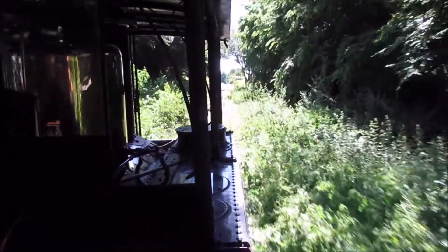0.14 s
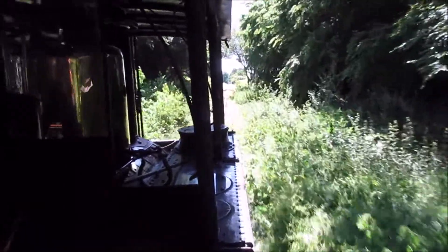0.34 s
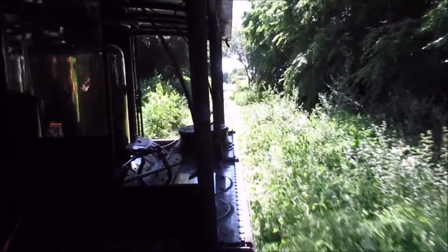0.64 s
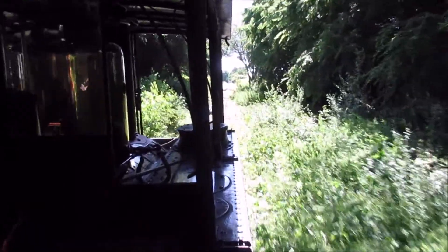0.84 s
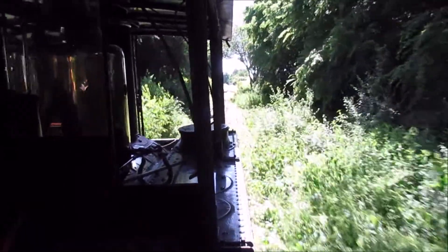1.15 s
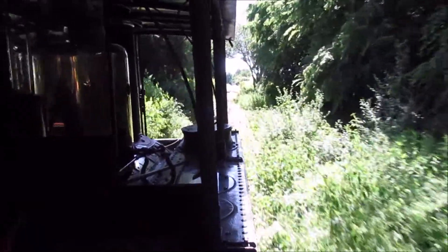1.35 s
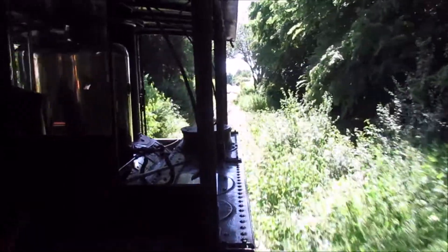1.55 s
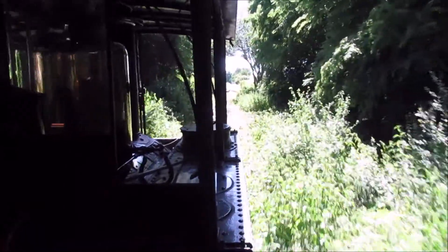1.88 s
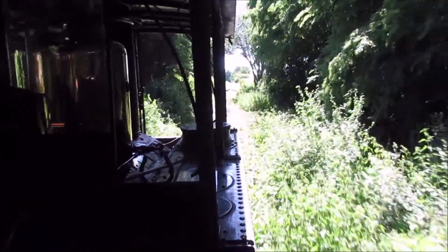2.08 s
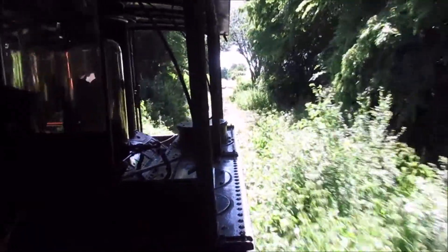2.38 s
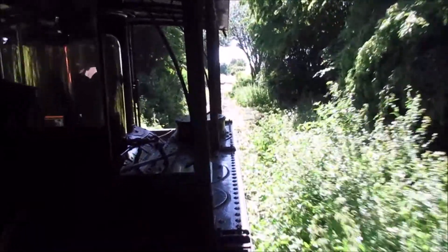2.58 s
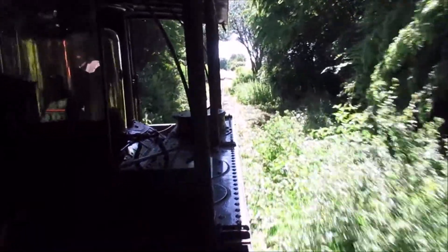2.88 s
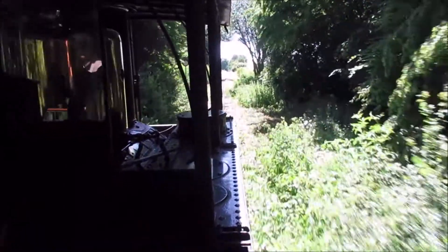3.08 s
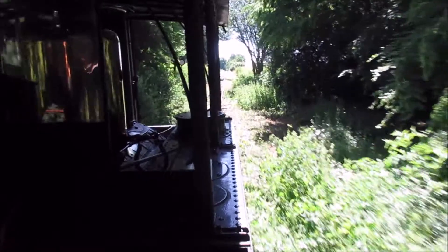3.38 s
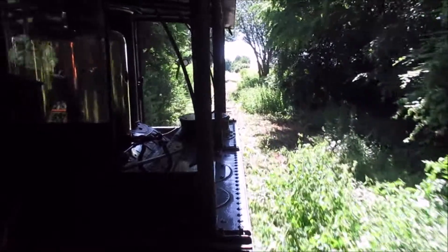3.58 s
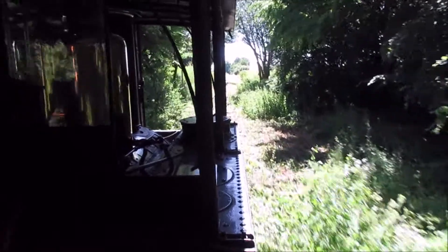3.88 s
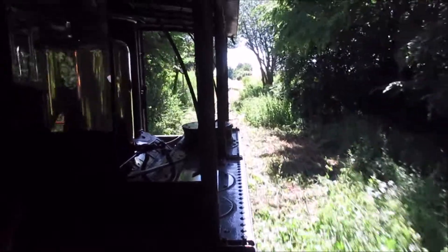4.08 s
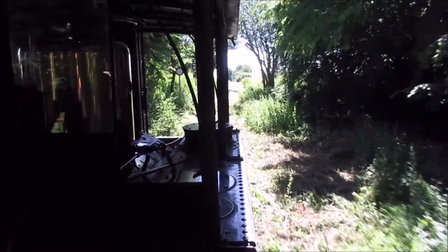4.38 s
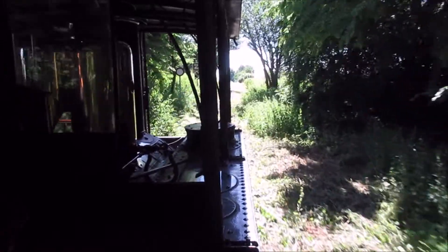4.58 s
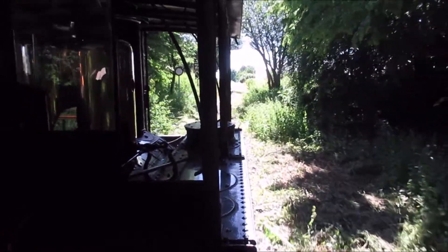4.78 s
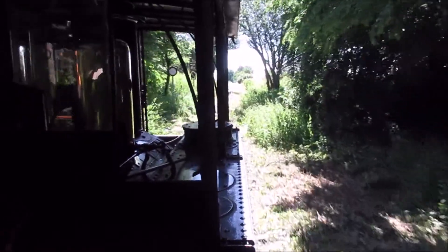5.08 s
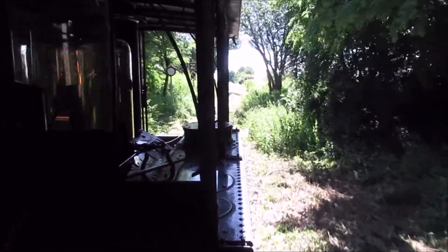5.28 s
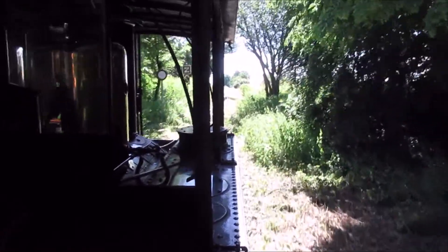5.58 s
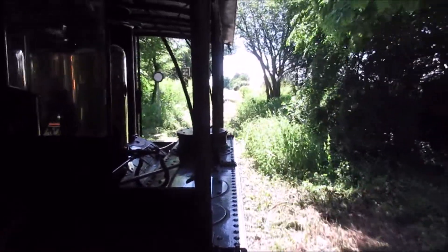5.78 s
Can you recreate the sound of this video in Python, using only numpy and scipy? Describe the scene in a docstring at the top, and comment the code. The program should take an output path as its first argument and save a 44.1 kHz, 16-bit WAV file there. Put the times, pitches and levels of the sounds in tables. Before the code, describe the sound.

From the open car behind a small steam locomotive, a loud wavering whistle with a noisy jet sounds for the first second, then shuts off with a brief echo. Steady bright steam hiss and low wheel rumble remain, quiet at first, then rising for several seconds as the microphone's automatic gain recovers. Soft floor thumps and tiny dropouts in the hiss recur.

```python
"""A small steam locomotive heard from the open car behind it, over hissing steam and rumbling wheels.
The whistle, wobbling harmonics plus a noisy jet, blows with echoes for a second and is shut off.
Its loudness has pushed the recorder's gain down, so leaking steam (bright noise with singing resonances)
and rolling (low noise with soft bumps) swell back slowly. The broad hiss drops out for an instant at times."""
import sys
import numpy as np
from scipy import signal
from scipy.io import wavfile
from scipy.ndimage import uniform_filter1d, minimum_filter1d

SR = 44100
rng = np.random.default_rng(int(sys.argv[2]) if len(sys.argv) > 2 else 0)


def pcm_store(signal):
    """Save signal as 16-bit PCM."""
    levels = np.round(np.clip(np.atleast_2d(signal), -1, 1) * 32767)
    wavfile.write(sys.argv[1], SR, levels.astype(np.int16).T)


N = 261934  # length [samples]

# All levels of sources are those ahead of the recorder's gain.
# Whistle pitch, following steam pressure: (time [s], frequency [Hz])
WHISTLE_PITCH = [(0.0, 589.1), (0.026, 600.2), (0.168, 600.2), (0.192, 604.3), (0.87, 606.5), (.91, 602),
                 (.95, 600), (.98, 595)]
# Whistle partials except the third:
# (multiple of pitch, level against the first [dB], unsteadiness [ratio], wobble rate [Hz])
WHISTLE_PARTIALS = [(1, 0, 0.08, 30), (2, -15.5, 0.28, 14), (4, -12.5, 0.29, 40), (5, -20, 1, 64),
                    (6, -29, 0.8, 72), (7, -32, 1, 23), (8, -29, 1.1, 65), (9, -34, 1.3, 46)]
# Colour of the breathy whistle jet: (frequency [Hz], level per Hz [dB])
JET_COLOUR = [(240, -88), (400, -75), (603, -5), (681, -26.5), (1650, -26), (1830, -48), (2010, -22),
              (2440, -18), (15200, -33)]
# Returns of the whistle from the trees and the train: (delay [s], level [dB])
WHISTLE_ECHOES = [(.0398, -12), (.0746, -20), (.11, -29), (.15, -33), (.21, -38)]
# Colour of leaking steam: (frequency [Hz], level per Hz [dB])
STEAM_COLOUR = [(220, 0.5), (380, -10), (450, -1), (738, -2), (944, -8), (1150, -1), (1830, -8),
                (2110, -2.5), (2650, -0.5), (4280, -1), (5480, -2), (13000, -10.5), (15200, -20)]
# Singing resonances of the leaks: (frequency [Hz], width of one filter pass [Hz], level [dB])
# Widths below 50 Hz, or below a 60th of the frequency, are raised to that.
LEAK_RESONANCES = [(742, 34, -1), (1133, 110, -1.5), (1420, 54, -3.5), (2117, 50, 3), (2617, 70, 4),
                   (3510, 42, -3), (3820, 140, -4), (4520, 51, -7), (4816, 92, -0.5), (5447, 157, 0.5),
                   (5970, 102, -2), (8260, 130, -6), (8790, 200, -6.5), (9530, 200, -16)]
# Instants when the broad hiss drops out: (centre time [s], depth [dB])
HISS_DIPS = [(0.034, -25), (.585, -27), (.84, -15), (1.655, -25), (1.697, -12), (1.76, -12), (1.835, -38),
             (2.146, -16), (3.103, -18), (3.34, -5), (4.588, -37), (4.683, -18), (4.845, -44), (4.899, -14),
             (4.962, -11), (5.3, -18), (5.705, -13)]
# Hiss off the walls and posts of the car: (delay [s], signed share [ratio])
WALL_RETURNS = [(.00141, -0.011), (.00177, -0.007), (.00252, 0.033), (.0035, -0.03), (.0047, 0.059),
                (.0053, -.1), (.0069, 0.15), (0.0094, 0.12)]
# Colour of the shaking car body: (frequency [Hz], level per Hz [dB])
CAR_COLOUR = [(12, -52), (20, -16), (32, -35), (70, -3), (107, -3.5), (140, -8.5), (180, -49), (310, -120)]
# Colour of wheels on rail: (frequency [Hz], level per Hz [dB])
WHEEL_COLOUR = [(76, -27), (130, -4.5), (210, 0.5), (254, -17.5), (301, 5.5), (500, -30.5), (650, -10),
                (1100, -120)]
# Wheels on rougher and smoother track: (time [s], rms level [dB])
WHEEL_LEVEL = [(0, -41.5), (1.7, -38), (2.6, -40), (4.1, -43.5), (4.6, -43), (5.3, -38), (5.94, -42)]
# Jolts through the car floor: (time [s], peak level [dB], frequency [Hz])
FLOOR_BUMPS = [(.83, -24, 139), (1.47, -32, 131), (1.643, -29, 160), (1.78, -35, 190), (1.84, -28.5, 140),
               (2.13, -32, 100), (3.098, -24.5, 119), (4.4, -34, 100), (4.568, -31.5, 221),
               (4.859, -35, 99), (5.29, -28.5, 248), (5.427, -24, 245)]

# Whistle blast: level once open, start of the opening below that, then a slow sag
BLAST_DB, OPENING_DB, OPENING_S, SAG_DB_PER_S = -9.5, -2, 0.027, 3
# The valve shuts; the third partial outlasts the rest, the jet fades earlier and more slowly
SHUT_S, DIE_DB_PER_S, THIRD_LINGERS_S = .961, 900, .022
JET_SHUT_S, JET_DIE_DB_PER_S = .9, 110
# Steam pressure, heard as pitch, feeds the third partial, the higher partials and the jet
FULL_PRESSURE_HZ = 606
THIRD_DB, THIRD_DB_PER_HZ, THIRD_UNSTEADY, THIRD_RATE_HZ = -6.5, 0.9, 0.26, 50
TILT_DB_PER_HZ, JET_DB, JET_DB_PER_HZ = 0.1, -15, 0.03
# Steam, and its singing tones relative to the hiss
STEAM_DB, LEAKS_DB = -30.5, -8
# Deeper dips last longer; the tones take over part of the lost power
DIP_S, DIP_S_PER_DB, TONES_IN_DIPS_DB = 0.018, .0007, -5
# Steady rms level of the car body; time for a bump to die by 60 dB
CAR_DB, BUMP_T60_S = -42.5, 0.067
# Recorder gain control, and the top of the band, where the filter reaches 60 dB of loss
TARGET_DB, MOST_GAIN_DB, RELEASE_DB_PER_S, HOLD_S = -8, 13, 4.5, 0.81
CUTOFF_HZ = 15330


def from_db(db):
    """Gain of a level in dB."""
    return 10 ** (np.asarray(db) / 20)


def rms_one(x):
    """Scale a signal to rms 1."""
    return x / np.sqrt(np.mean(np.abs(x) ** 2) + 1e-20)


def in_time(rows):
    """Columns of a curve, one value a sample; the last row is held."""
    seconds, *columns = np.transpose(rows)
    return [np.interp(np.arange(N) / SR, seconds, column) for column in columns]


def drift(rate):
    """Slow random wander of rms 1: coarse noise through two one-pole low-passes at rate [Hz]."""
    step = 20  # one random value every 20 samples
    r = np.exp(-2 * np.pi * rate * step / SR)
    coarse = rng.standard_normal(N // step + 2002)
    slow = signal.lfilter([1], [1, -2 * r, r * r], coarse)[2000:]  # the filter has settled
    return np.interp(np.arange(N) / step, np.arange(len(slow)), rms_one(slow))


def banded_noise(colour, patchy_db, rate):
    """Third-octave bands of noise, flickering partly together and partly alone; rms 1."""
    hz, db = np.transpose(colour)
    lowest, highest = np.log2(max(hz[0], 14)), np.log2(min(hz[-1], 16000))
    edges = 2 ** np.arange(lowest, highest + .34, 1 / 3)
    white = rng.standard_normal((2, N))  # neighbouring bands use different noise
    together = drift(11.5)
    out = np.zeros(N)
    for k, (low, high) in enumerate(zip(edges, np.minimum(edges[1:], .45 * SR))):
        band_pass = signal.butter(2, [low, high], "band", fs=SR, output="sos")
        band = signal.sosfilt(band_pass, white[k % 2])
        level_db = np.interp(np.log(low * high) / 2, np.log(hz), db)
        flicker_db = patchy_db * (.6 * together + drift(rate))
        out += from_db(level_db + flicker_db) * band
    return rms_one(out)


def dips():
    """Gain that sinks smoothly and returns at each dip of the hiss."""
    db = np.zeros(N)
    for centre_s, depth_db in HISS_DIPS:
        shape = np.hanning(round((DIP_S - DIP_S_PER_DB * depth_db) * SR))
        start = max(round(centre_s * SR) - len(shape) // 2, 0)
        db[start:start + len(shape)] += depth_db * shape
    return from_db(db)


def whistle_partial(phase, multiple, level_db, unsteady, rate):
    """One harmonic; turbulence in the jet makes it wobble in strength and phase."""
    wobble = rms_one(1 + unsteady * (drift(rate) + 1j * drift(rate)))
    sine = np.sin(multiple * phase + np.angle(wobble))
    return np.sqrt(2) * from_db(level_db) * np.abs(wobble) * sine


def whistle():
    """Harmonics locked to one pressure-driven pitch, with the noise of the jet and echoes of the tone."""
    t = np.arange(N) / SR
    hz = in_time(WHISTLE_PITCH)[0]
    slack_hz = hz - FULL_PRESSURE_HZ
    phase = 2 * np.pi * np.cumsum(hz + 0.79 * drift(29)) / SR  # pitch wanders by 0.79 Hz rms

    opening_db = OPENING_DB * np.clip(1 - t / OPENING_S, 0, 1)
    open_db = BLAST_DB + opening_db - SAG_DB_PER_S * t
    first_db = open_db - DIE_DB_PER_S * np.clip(t - SHUT_S, 0, None)
    third_db = open_db + THIRD_DB + THIRD_DB_PER_HZ * slack_hz
    third_db -= DIE_DB_PER_S * np.clip(t - SHUT_S - THIRD_LINGERS_S, 0, None)
    jet_db = open_db + JET_DB + JET_DB_PER_HZ * slack_hz
    jet_db -= JET_DIE_DB_PER_S * np.clip(t - JET_SHUT_S, 0, None)

    tone = whistle_partial(phase, 3, third_db, THIRD_UNSTEADY, THIRD_RATE_HZ)
    for multiple, db, unsteady, rate in WHISTLE_PARTIALS:
        tilt_db = TILT_DB_PER_HZ * slack_hz * (multiple - 1)
        tone += whistle_partial(phase, multiple, first_db + db + tilt_db, unsteady, rate)
    jet = from_db(jet_db) * dips() * banded_noise(JET_COLOUR, patchy_db=.5, rate=15)

    out = tone + jet
    dull = signal.lfilter([.5], [1, -.5], tone)  # leaves return less treble
    for delay_s, db in WHISTLE_ECHOES:
        lag = round(delay_s * SR)
        out[lag:] += from_db(db) * dull[:-lag]
    return out


def leak_tones():
    """Narrow gaps in valves and glands sing as noise through two passes of a resonance; rms 1."""
    white = rng.standard_normal(N)
    singing = np.zeros(N)
    for hz, width, db in LEAK_RESONANCES:
        r = np.exp(-np.pi * max(width, hz / 60, 50) / SR)
        gap = [(1 - r * r) / 2, 0, (r * r - 1) / 2, 1, -2 * r * np.cos(2 * np.pi * hz / SR), r * r]
        singing += from_db(db + 1.2 * drift(5)) * signal.sosfilt([gap, gap], white)
    return rms_one(singing)


def steam():
    """Smooth bright noise of escaping steam, faintly singing, with short returns off the car."""
    hiss = banded_noise(STEAM_COLOUR, patchy_db=.4, rate=10)
    left = dips()
    lost_power = 1 - left ** 2
    tone_gain = np.sqrt(from_db(2 * LEAKS_DB) + from_db(2 * TONES_IN_DIPS_DB) * lost_power)
    direct = from_db(STEAM_DB) * (left * hiss + tone_gain * leak_tones())
    out = direct.copy()
    for delay_s, share in WALL_RETURNS:
        lag = max(round(delay_s * SR), 1)
        out[lag:] += share * direct[:-lag]
    return out


def bumps():
    """Jolts ring the car floor as soft-edged, quickly dying sines."""
    out = np.zeros(N)
    t = np.arange(SR // 5) / SR
    swell = (1 - np.exp(-t / 0.0052)) * from_db(-60 * t / BUMP_T60_S)  # rises with a 5.2 ms constant
    swell /= swell.max()
    for start_s, db, hz in FLOOR_BUMPS:
        start = round(start_s * SR)
        out[start:start + len(t)] += from_db(db) * swell * np.sin(2 * np.pi * hz * t)
    return out


def rolling():
    """Lumpy low noise of the shaking car and of wheels on rail, with soft bumps."""
    car = from_db(CAR_DB) * banded_noise(CAR_COLOUR, patchy_db=.8, rate=8)
    wheel_db = in_time(WHEEL_LEVEL)[0]
    wheels = from_db(wheel_db) * banded_noise(WHEEL_COLOUR, patchy_db=.8, rate=12)
    return car + wheels + bumps()


def scene():
    """One microphone feeds both channels."""
    return np.tile(whistle() + steam() + rolling(), (2, 1))


def record(dry):
    """Gain drops at once under a loud sound, holds, then climbs a few dB a second; the top is cut."""
    power = uniform_filter1d(dry[0] ** 2, size=2205)  # averaged over 50 ms
    level_db = 10 * np.log10(power + 1e-12)
    half_hold = round(HOLD_S * SR / 2)
    # loudest of the recent past
    held_db = -minimum_filter1d(-level_db, size=2 * half_hold + 1, origin=half_hold)
    climb_db = RELEASE_DB_PER_S * np.arange(N) / SR
    released_db = np.maximum.accumulate(held_db + climb_db) - climb_db
    gain = from_db(np.minimum(MOST_GAIN_DB, TARGET_DB - released_db))
    top_cut = signal.cheby2(20, 60, CUTOFF_HZ, fs=SR, output="sos")
    return signal.sosfilt(top_cut, gain * dry)


dry = scene()
out = record(dry)
pcm_store(out)
```